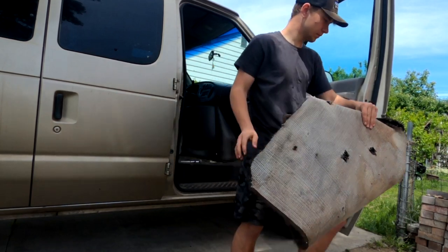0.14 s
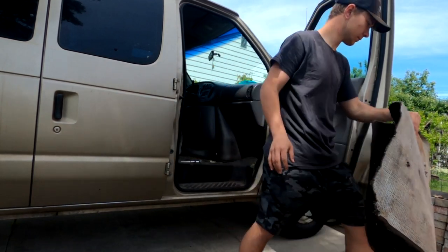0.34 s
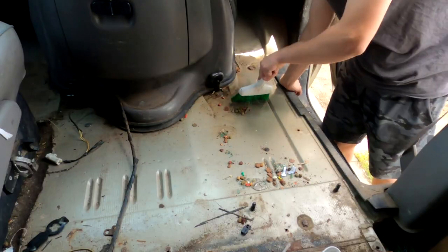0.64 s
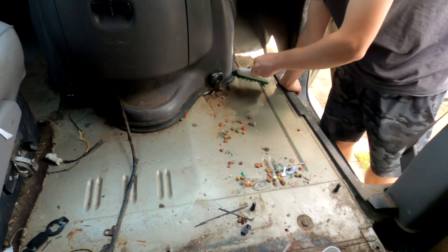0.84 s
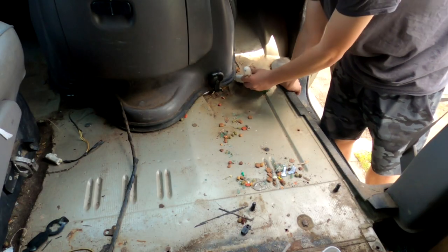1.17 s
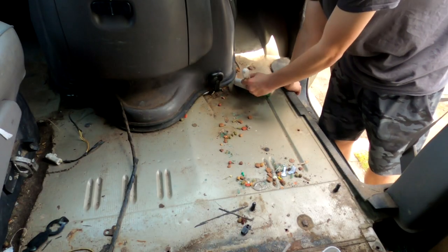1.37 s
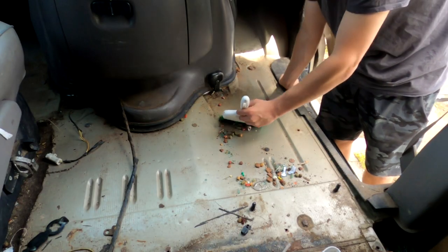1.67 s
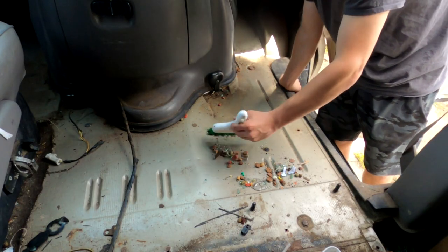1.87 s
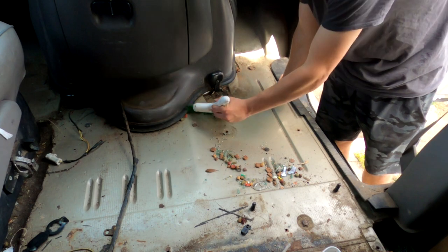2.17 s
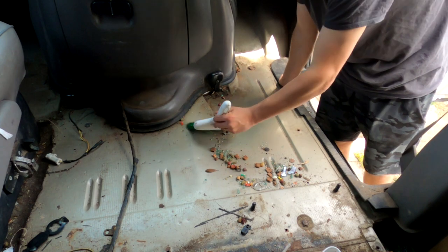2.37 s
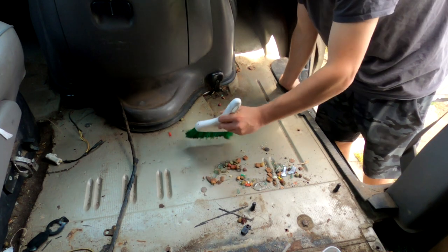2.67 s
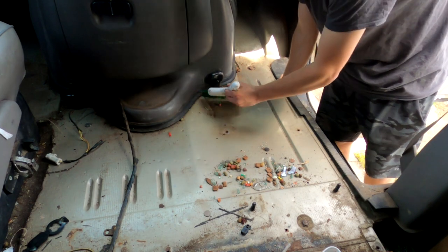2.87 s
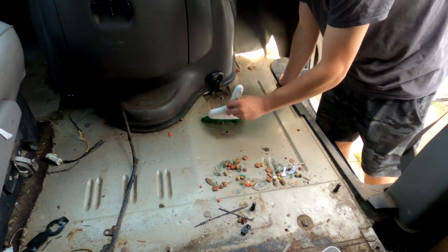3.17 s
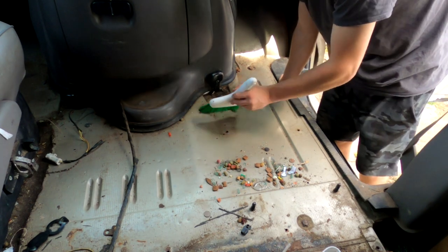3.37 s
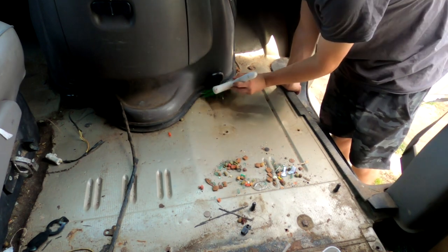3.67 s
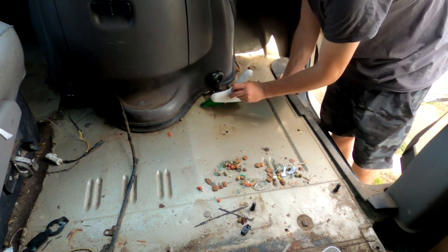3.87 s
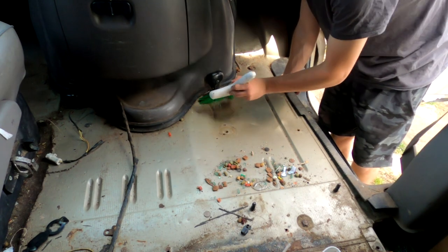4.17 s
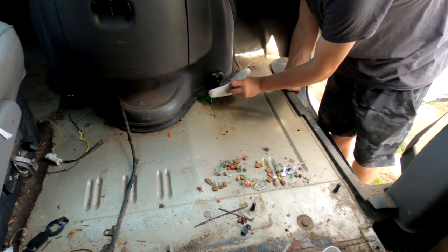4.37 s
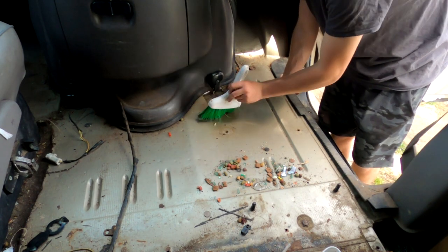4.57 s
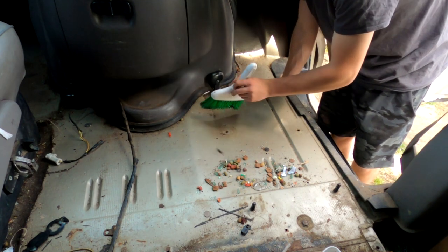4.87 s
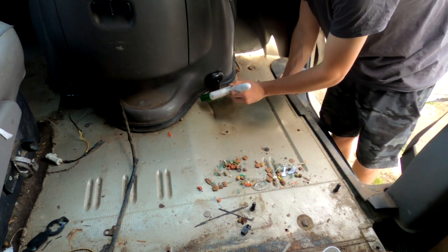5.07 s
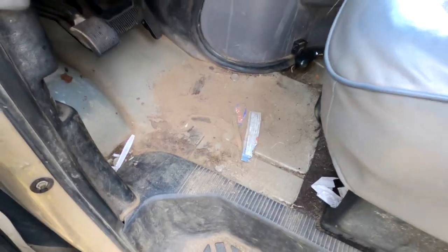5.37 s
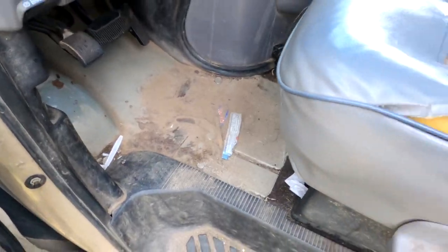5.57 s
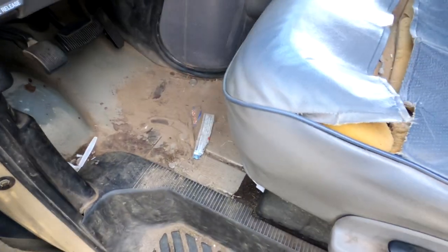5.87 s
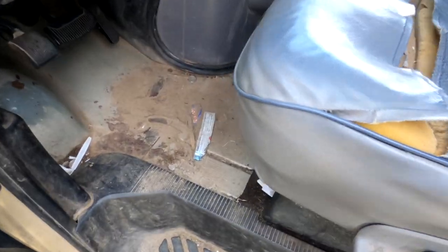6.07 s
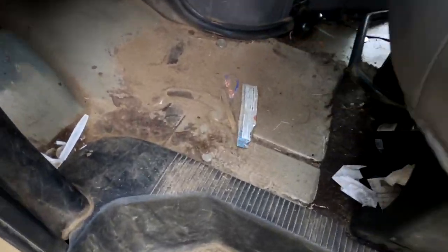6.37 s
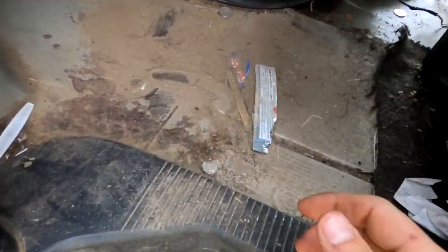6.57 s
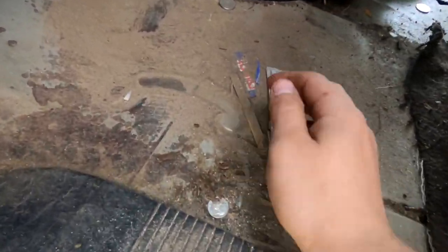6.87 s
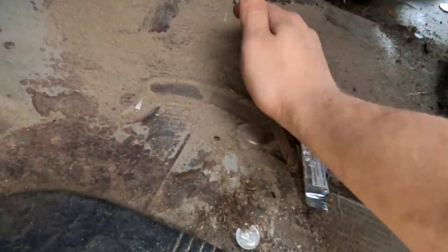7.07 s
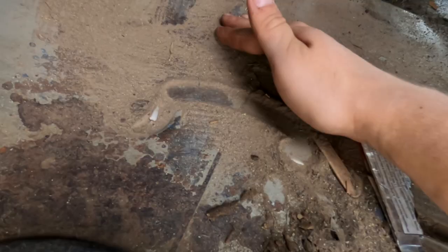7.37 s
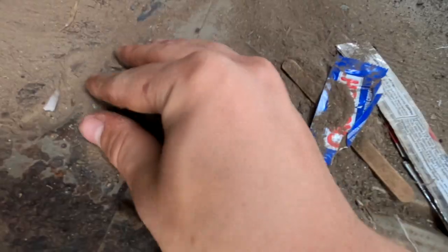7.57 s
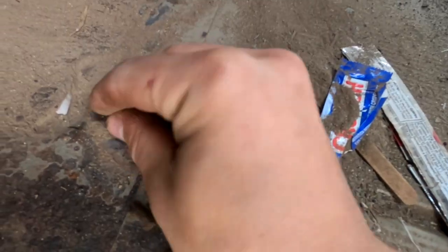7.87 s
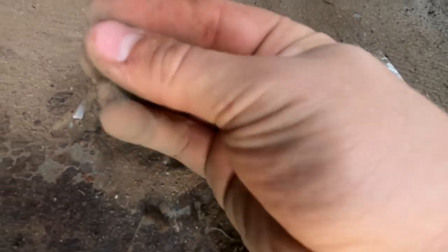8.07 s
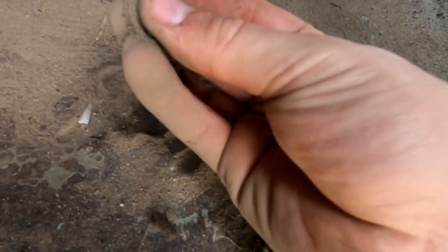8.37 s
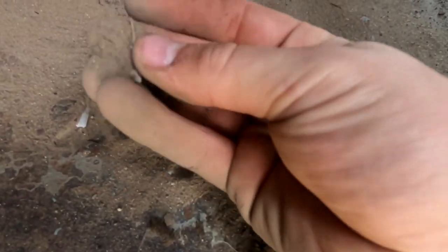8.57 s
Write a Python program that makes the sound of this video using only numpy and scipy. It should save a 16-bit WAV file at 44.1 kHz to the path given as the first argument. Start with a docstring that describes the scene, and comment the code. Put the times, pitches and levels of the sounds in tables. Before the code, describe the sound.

For the first half second, wind buffets the microphone outdoors over faint distant traffic. The sound cuts to the quiet inside of a van, where a hand brush sweeps grit across the bare metal floor. Scraping strokes mix with sharp dabs and crackling debris, and the panel rings and booms. The strongest strokes come around 0.8, 1.8 and 2.5 seconds; lighter ones continue until about 5, with a faint deep rumble near 4. At 5.5 seconds gusty wind and distant traffic return by the open door. A few soft, close clicks fall between 6.1 and 6.9. At about 7.3 and 7.5 a palm lands with two short low thuds and drags through sand, the gritty scrape turning hollow and fading by 8. Fingers then rub the sand in a quiet, bright rustle, with a faint wavering hum under the wind, ending near 8.7 seconds.

```python
"""Sweeping out a van

Three scenes. Outside, wind buffets the microphone over distant traffic. Inside, a hand brush sweeps grit
over the bare metal floor in strokes and dabs, and the panel rings and booms. Then, by the open door in
wind and traffic, a palm lands, drags through sand, and the fingers rub it."""
import sys
import numpy as np
from scipy import signal
from scipy.fft import rfft, irfft, next_fast_len
from scipy.io import wavfile
from scipy.ndimage import uniform_filter1d, map_coordinates

SR = 44100
rng = np.random.default_rng(int(sys.argv[2]) if len(sys.argv) > 2 else 0)


def int16_out(signal):
    """Quantize to a 16-bit WAV file."""
    q = np.round(np.clip(np.atleast_2d(signal).T, -1, 1) * 32767)
    wavfile.write(sys.argv[1], SR, q.astype(np.int16))


N = 384993
T = np.arange(N) / SR


def amp(db):
    return 10 ** (np.asarray(db) / 20)


def unit(x):
    return x / np.sqrt(np.mean(x ** 2) + 1e-20)


def along(points, hz):
    """Read (f, value) points on a log frequency axis."""
    f, v = np.transpose(points)
    return np.interp(np.log(hz + 1), np.log(f + 1), v)


def curve(points, outside=None):
    """Draw (t, value) points as one value per sample."""
    times, values = np.transpose(points)
    return np.interp(T, times, values, outside, outside)


def wobble(rate):
    """A smooth random curve, rate knots a second."""
    return map_coordinates(rng.standard_normal(int(N * rate / SR) + 4), [T * rate])


def filtered(x, response):
    """x through a complex frequency response."""
    m = next_fast_len(N + 8192)
    return irfft(rfft(x, m) * response(np.fft.rfftfreq(m, 1 / SR)), m)[..., :N]


def modes(table, hz):
    """Causal response of a set of resonances."""
    return sum((-1) ** k * amp(db) * 1j * hz * width / (centre ** 2 - hz * hz + 1j * hz * width)
               for k, (centre, width, db) in enumerate(table))


def shaped(x, spectrum, lo_hz=0, hi_hz=SR):
    """One band of x through an EQ curve, at rms 1."""
    edge = lambda hz: 1 / np.sqrt((1 + (lo_hz / (hz + 1)) ** 8) * (1 + (hz / hi_hz) ** 8))
    return unit(filtered(x, lambda hz: amp(along(spectrum, hz)) * edge(hz)))


def contact(start, t60, rise, hold=0):
    """Attack, hold and decay envelope of a contact; times in s."""
    age = np.arange(SR // 2) / SR
    attack = 1 - np.exp(-age / max(rise, 1e-4))
    decay = amp(-60 * np.maximum(age - hold, 0) / max(t60, .01))
    out = np.zeros(N + len(age))
    out[round(start * SR):][:len(age)] = attack * decay
    return out[:N]


def patchy(x, depth_db):
    """Favour other narrow bands every few tens of ms, as shifting contact points do."""
    spectra = signal.stft(x, nperseg=512)[2]
    field = uniform_filter1d(rng.standard_normal(spectra.shape[1:]), size=2, axis=0)
    field = uniform_filter1d(field, size=8, axis=1)
    return signal.istft(spectra * amp(depth_db * unit(field)), nperseg=512)[1][:, :N]


# Left-right likeness at full width: f/Hz, correlation
LIKENESS = [(60, .95), (300, .96), (700, .94), (1400, .88), (3000, .68), (6500, .55), (15000, .1)]

def noise(wide=1):
    """White stereo noise that spreads towards the treble."""
    turn = lambda hz: np.arccos(np.clip(along(LIKENESS, hz), -1, 1)) / 2
    mid, side = filtered(rng.standard_normal((2, N)), lambda hz: [np.cos(turn(hz)), wide * np.sin(turn(hz))])
    return np.array([mid + side, mid - side])


# Outside, inside, open door: start/s, end/s, fade-in/s
SCENES = [(0, .456, .001), (.458, 5.25, .001), (5.46, 9, .06)]

def by_place(outside, inside, door, sill):
    """Switch a bed with the scene; the last scene moves from door to sill at 7.3 s."""
    return np.select([T < SCENES[0][1], T < SCENES[1][1], T < 7.3], [outside, inside, door], sill)


# Traffic fader: t/s, level/dB
TRAFFIC_LEVEL = [(0, -50), (.45, -53), (.48, -63), (1.3, -63), (2.25, -65), (3.7, -65), (5, -65),
                 (5.25, -67), (5.46, -41), (5.65, -39), (5.9, -44.5), (6.3, -42.5), (6.7, -43),
                 (7.1, -46.5), (7.3, -48), (8.05, -54), (8.4, -56), (8.73, -56)]
# Street EQ beside the van, inside it and at the door: f/Hz, level/dB
YARD_EQ = [(240, -30), (400, -12.5), (1250, -18), (1480, -24), (1890, -23.5), (2000, -27), (2340, -25),
           (7830, -40), (12000, -58), (15600, -101), (22000, -120)]
CABIN_EQ = [(200, 2.5), (300, 4.5), (700, -10.5), (1200, -8), (1800, -14.5), (2500, -18.5), (5000, -22.5),
            (9000, -29.5), (15000, -50.5)]
STREET_EQ = [(180, -30), (300, 0), (348, -5), (691, -13), (884, -7), (1440, -7), (2970, -33), (7060, -41),
             (9640, -48), (12100, -77), (15000, -82)]

def traffic():
    """A wash of distant traffic, coloured by each place."""
    wash = patchy(noise(), depth_db=3)
    street = shaped(wash, STREET_EQ)
    bed = by_place(shaped(wash, YARD_EQ), shaped(wash, CABIN_EQ), street, street)
    return amp(curve(TRAFFIC_LEVEL)) * bed


# Wind fader, one curve a scene: t/s, level/dB
WIND_LEVEL = [
    [(0.0, -21), (0.1, -28), (0.14, -32.5), (0.2, -27), (0.29, -23), (0.35, -30), (0.41, -28.5),
     (0.455, -23)],
    [(0.459, -54.5), (1.9, -50.5), (2.4, -50), (3.75, -52), (3.81, -48.5), (4.7, -53.5), (5.25, -55.5)],
    [(5.5, -27.5), (5.8, -25.5), (6.1, -29), (6.3, -22.5), (6.9, -34.5), (7.33, -28), (7.36, -16.5),
     (7.41, -33), (7.47, -27), (8.0, -26), (8.06, -33.5), (8.4, -30), (8.73, -25)],
]
# Wind EQ in the open, in the cabin and low over the sill: f/Hz, level/dB
BUFFET_EQ = [(8.8, -27), (15, 0), (32, 0), (81, 1.5), (191, -11.5), (238, -13), (350, -39.5), (414, -34),
             (600, -42), (780, -42), (1320, -120)]
SHELTERED_EQ = [(8.8, -31.5), (15, 9.5), (48, 1.5), (130, -5), (276, -14), (339, -34), (400, -24),
                (520, -34), (880, -120)]
SILL_EQ = [(8.8, -27), (15, 4.5), (38, 1), (108, 6), (162, -17.5), (253, -17.5), (314, -33.5), (402, -21.5),
           (600, -31), (780, -44), (1320, -120)]

def wind():
    """Lumps of moving air buffet the microphone."""
    gust_db = 1.5
    lumps = amp(0.4 * wobble(17) + 1.74 * wobble(40)) * noise(wide=0.34)
    gusts = shaped(lumps, BUFFET_EQ)
    gusts = unit(gusts - 0.12 * (gusts ** 2 - 1))  # suction peaks are sharper than pressure peaks
    sheltered = shaped(amp(2.2 * wobble(9)) * noise(wide=0.88), SHELTERED_EQ)
    bed = by_place(gusts, sheltered, gusts, shaped(lumps, SILL_EQ))
    return amp(curve(WIND_LEVEL[0] + WIND_LEVEL[1] + WIND_LEVEL[2]) + gust_db * wobble(15)) * bed


# Drone fader: t/s, level/dB
DRONE_LEVEL = [(3.7, -78), (3.82, -42.5), (4.3, -48), (4.9, -56), (5.25, -63)]
# Its resonance: f/Hz, width/Hz, level/dB
DRONE_MODE = [(39.3, 10, 0)]

def drone():
    """A narrow band of sub-bass swells in the cabin."""
    rumble = unit(filtered(noise(wide=0.15), lambda hz: modes(DRONE_MODE, hz) ** 2))
    return amp(curve(DRONE_LEVEL, outside=-120)) * rumble


# Hum fader: t/s, level/dB
HUM_LEVEL = [(8.1, -74), (8.2, -51), (8.73, -53)]

def hum(pitch_hz=400):
    """A thin, wavering tone at the very end."""
    tone = np.sin(2 * np.pi * np.cumsum(pitch_hz + 4 * wobble(10)) / SR)
    return amp(curve(HUM_LEVEL, outside=-120) + 2.5 * wobble(26)) * tone


# Click cues: t/s, level/dB, f/Hz, width/Hz, t60/s, broadband share
CLICKS = [(6.138, -36, 2200, 1500, .07, .01), (6.258, -44, 2000, 1600, .12, .02),
          (6.335, -36, 720, 500, .09, .12), (6.692, -45, 2800, 900, .05, .05),
          (6.838, -42, 3900, 300, .06, .02)]

def clicks():
    """Soft close clicks: puffs of dull noise, each with one resonance."""
    puff = filtered(noise(), lambda hz: 1 / (1 + (hz / 3000) ** 2) / (1 + (hz / 9000) ** 6))
    out = 0
    for start, db, centre, width, t60, share in CLICKS:
        body = unit(filtered(puff, lambda hz: share + modes([(centre, width, 0)], hz)))
        out = out + amp(db) * contact(start, t60, rise=.003) * body
    return out


def friction(lump_db, grain_db, patch_db):
    """Gritty noise: slow pressure lumps, fast grains and single pebbles snapping loose."""
    snaps_per_s, spread_db, snap_db = 1200, 4, -11
    chance, size = rng.random(N), rng.exponential(size=N)
    snaps = unit((chance < snaps_per_s / SR) * amp(spread_db * np.minimum(size, 3)))
    crackle = np.convolve(snaps, amp(-60 * np.arange(40) / 40))[:N]
    hiss = patchy(noise(), patch_db) * amp(lump_db * wobble(90) + grain_db * wobble(1500))
    return hiss * (1 + amp(snap_db) * unit(crackle))


# Metal floor resonances: f/Hz, width/Hz, level/dB
FLOOR_MODES = [(591, 54, -9), (846, 48, -2.5), (1057, 9.1, 1.5), (1225, 24, 4.5), (1374, 11, -1),
               (1751, 5.7, 7), (2130, 12, -13.5), (2217, 11, -2.5), (2727, 2.4, 7.5), (3456, 14, 4),
               (4420, 10, -2), (5770, 59, 2)]

def floor_panel(force):
    """The floor panel adds its resonances to a friction force."""
    return filtered(force, lambda hz: 1 + amp(4.5) * modes(FLOOR_MODES, hz))


# Rub fader: t/s, level/dB
RUB_LEVEL = [(8.1, -57), (8.25, -64), (8.35, -58), (8.546, -50.5), (8.73, -54.5)]
# Rub EQ: f/Hz, level/dB
RUB_EQ = [(1060, -21), (1800, -11), (2080, -7.5), (2430, -6.5), (2650, -3), (3860, -14.5), (5170, -8),
          (7880, -14.5), (8730, -15), (9850, -23), (12700, -26), (14000, -34)]

def finger_rub():
    """Fingers rub sand into a fine, bright rustle."""
    force = friction(lump_db=1.5, grain_db=1, patch_db=1)
    return amp(curve(RUB_LEVEL, outside=-120)) * shaped(force, RUB_EQ)


# Hand landings: t/s, level/dB, f/Hz
LANDINGS = [(7.348, 4, 132), (7.539, -2.5, 92)]

def hand_thumps():
    """The hand lands twice on the floor, each time a short low thud."""
    return sum(amp(db) * contact(start, t60=.014, rise=.0021) * np.sin(2 * np.pi * hz * (T - start))
               for start, db, hz in LANDINGS)


# Drag fader, and the hollow relative to it: t/s, level/dB
DRAG_LEVEL = [(6.9, -58), (7.324, -59), (7.346, -39), (7.352, -35.5), (7.396, -44), (7.43, -31.5),
              (7.458, -27.5), (7.5, -28.5), (7.545, -29), (7.6, -26.5), (7.73, -33), (7.84, -36.5),
              (7.948, -50.5), (8.0, -45), (8.044, -60), (8.12, -60.5)]
HOLLOW_LEVEL = [(7.35, -35), (7.45, -16), (7.72, -9), (7.75, 8.5), (7.769, -1), (7.7715, 12.5),
                (7.796, 11.5), (7.806, 5.5), (7.824, 4), (7.828, 18.5), (7.842, 13), (7.85, 9), (7.94, 9),
                (7.97, 12.5), (8.01, 6.5), (8.03, -6)]
# Sand EQ: f/Hz, level/dB
SAND_EQ = [(110, -30), (180, 1), (213, -3.5), (652, -6), (816, -5), (948, -5.5), (1510, -2.5),
           (2080, -12.5), (2750, -10.5), (3190, -15.5), (7520, -23.5), (12200, -31), (15600, -43.5)]
# Resonances under the cupped hand and the flat hand: f/Hz, width/Hz, level/dB
CUP_MODE = [(1410, 400, 0)]
HEEL_MODES = [(538, 72, -3), (915, 99, 0)]

def palm_drag():
    """The palm drags through sand: flat, it booms on the panel; cupped, it sounds hollow."""
    drum_db, heel_db, heel_ring_db, fizz_db = -4, 5, -3.5, -35.5
    age, second_landing = T - DRAG_LEVEL[0][0], LANDINGS[1][0]
    drag_db = curve(DRAG_LEVEL, outside=-200)
    scrape = amp(drag_db) * np.clip(age / .2, 0, 1)
    drum = scrape * amp(drum_db + heel_db * (T < second_landing + .015))
    fizz = amp(fizz_db + 0.8 * (drag_db - drag_db.max())) * np.clip(age / .25, 0, 1)
    flat = (T > 7.43) & (T < second_landing + .012)
    force = friction(lump_db=1, grain_db=0, patch_db=2)
    hollow = unit(filtered(noise(wide=.4), lambda hz: modes(CUP_MODE, hz) ** 2))
    heel = unit(filtered(force, lambda hz: modes(HEEL_MODES, hz)))
    return (scrape * shaped(floor_panel(force), SAND_EQ, 1820, 7000)
            + drum * shaped(force, SAND_EQ, 0, 970)
            + fizz * shaped(force, SAND_EQ, 3800)
            + scrape * amp(curve(HOLLOW_LEVEL)) * hollow
            + scrape * flat * amp(heel_ring_db) * heel)


# Squeak cues: start/s, end/s, f/Hz, level/dB
SQUEAK_CUES = [(0.617, 0.76, 12800, -47), (0.79, 0.83, 9600, -47), (1.752, 1.803, 12900, -41),
               (2.6, 2.783, 12900, -57)]

def squeaks():
    """Thin, rough squeaks swell and fade at the top of the brushing."""
    out = 0
    for start, end, hz, db in SQUEAK_CUES:
        swell = np.sin(np.pi * np.clip((T - start) / (end - start), 0, 1))
        out = out + amp(db) * swell * wobble(350) * np.sin(2 * np.pi * hz * T)
    return out


# Clear panel notes: t/s, f/Hz, hold/s, level/dB
PANEL_NOTES = [(3.993, 347, .03, -42), (4.625, 345, 0.035, -35.5)]

def panel_notes():
    """A low panel mode sings out briefly."""
    out = 0
    for start, hz, hold, db in PANEL_NOTES:
        envelope = contact(start, t60=.17, rise=.0028, hold=hold)
        out = out + amp(db + 1.3 * wobble(60)) * envelope * np.sin(2 * np.pi * hz * T)
    return out


# Lowest panel modes: f/Hz, width/Hz, level/dB
BOOM_MODES = [(195, 37, -14), (342.4, 34, -0.5)]
# Their swells: t/s, half length/s, level/dB
BOOM_SWELLS = [(0.69, 0.11, -42), (1.81, 0.024, -47), (1.963, 0.029, -41), (2.304, 0.06, -53),
               (3.038, 0.23, -49), (3.216, 0.068, -42), (3.795, 0.04, -55), (3.983, 0.14, -45.5),
               (4.415, 0.038, -50), (4.595, 0.048, -42.5)]

def panel_boom(stroke_drum):
    """The lowest modes boom along with the strokes, with extra swells on cue."""
    level = amp(-8.5) * stroke_drum
    for peak, half, db in BOOM_SWELLS:
        level = np.hypot(level, amp(db) * np.clip(1 - np.abs(T - peak) / half, 0, 1))
    return level * unit(filtered(noise(wide=0.6), lambda hz: modes(BOOM_MODES, hz)))


# Stroke cues: t/s, rise/s, hold/s, level/dB, sag/(dB/s), brightness/dB, drum/dB
STROKE_CUES = [(0.471, 0.0023, 0.074, -35, -5, -7.5, -8), (0.491, 0.11, 0.35, -33.5, 9.5, -2.5, 1),
               (0.98, 0.013, 0.23, -48.5, 62, -10.5, 8.5), (1.25, 0.023, 0.18, -64, 27, 3, 10.5),
               (1.433, 0.035, 0.24, -61, -10.5, 10, 4), (1.734, 0.063, 0.27, -30.5, 37, -3, 4),
               (2.235, 0.044, 0.047, -60, -2, 0.5, 10.5), (2.333, 0.099, 0.02, -51.5, 0, 6.5, 3),
               (2.499, 0.087, 0.31, -37, 16, -2.5, -4), (2.919, 0.022, 0.063, -51.5, 8, -8, 10),
               (3.069, 0.22, 0.022, -37, 2, -3, -5), (3.49, 0.016, 0.14, -55.5, 64, 2.5, 10.5),
               (3.735, 0.051, 0.087, -47, 77, -4.5, 3.5), (3.83, 0.14, 0.12, -46.5, 18, 3.5, 4),
               (4.181, 0.066, 0.19, -44, 53, -1, -4.5), (4.471, 0.12, 0.094, -46, 1, 4, 1.5),
               (4.807, 0.023, 0.28, -49, 147, -6.5, -2.5)]

def strokes():
    """Scrape, rasp, drum and fizz envelopes of long strokes, which dull and drum more as they go."""
    rise_db, lift_db_per_s, dull_db_per_s, deepen_db_per_s = 16.5, 392, 8.5, 18.5
    rasp_db, drum_trim_db, fizz_db = -7.5, -9, -6.5
    pressure_db = .7 * wobble(14)  # the hand presses unevenly
    bands = np.zeros((4, N))
    for start, rise, hold, db, sag, bright_db, drum_db in STROKE_CUES:
        age = np.maximum(T - start, 0)
        shape_db = -rise_db * np.clip(1 - age / rise, 0, 1) - sag * np.clip(age - rise, 0, hold)
        lift_db = lift_db_per_s * np.maximum(age - rise - hold, 0)
        scrape = (T > start) * amp(db + pressure_db + shape_db - lift_db)
        treble = scrape * amp(bright_db - dull_db_per_s * age)
        drum = scrape * amp(drum_trim_db + drum_db + deepen_db_per_s * np.minimum(age, rise + hold))
        fizz = treble * amp(fizz_db - dull_db_per_s * age)
        bands = np.hypot(bands, [scrape, treble * amp(rasp_db), drum, fizz])
    return bands


# Dab cues: t/s, rise/s, level/dB, brightness/dB, ring f/Hz, ring/dB, t60/s
DAB_CUES = [(0.474, .002, -42.5, -5.5, 1806, 11.5, 0.34), (.5207, 0.016, -37.5, -14, 1280, 11.5, 0.24),
            (.637, 0.0062, -44, 15.5, 1100, -3, 0.065), (0.713, 0.0028, -27.5, -2, 1700, 4.5, 0.074),
            (.745, 0.0058, -27.5, 0.5, 2700, -6, 0.027), (.782, .004, -31.5, -14, 1066, -4, 0.17),
            (0.813, 0.0063, -26, 1, 1370, -4, 0.025), (.85, .004, -30, 1.5, 1368, -1, 0.063),
            (.876, 0.0052, -30, 0.5, 1800, 7.5, 0.04), (.9, 0.0025, -26.5, -10, 1040, 2, 0.028),
            (.925, 0.019, -32, -19, 1160, 7, 0.14), (0.972, 0.0027, -33, -15.5, 1380, -1, 0.17),
            (1.112, 0.0013, -51.5, -15.5, 1390, 9, 0.11), (1.1747, 0.0052, -53.5, -7, 1340, 0, 0.5),
            (1.47, .002, -69, -1, 2500, -6, 0.066), (1.7483, 0.0019, -42.5, 8.5, 2060, 0, 0.25),
            (1.7, 0.026, -52, 16, 1330, -8, 0.24), (1.8066, 0.0028, -33, 8, 1000, 2, 0.083),
            (1.853, 0.0051, -27, -2.5, 1450, -1, 0.1), (1.912, .003, -38.5, -2.5, 2000, -3, 0.035),
            (1.948, 0.0043, -27.5, -6, 1250, -3, 0.037), (2.02, 0.0074, -35, -0.5, 2000, 8, 0.044),
            (2.091, 0.001, -36.5, -8.5, 1700, -6, 0.27), (2.1146, 0.0017, -28, 0, 1420, 2, 0.084),
            (2.276, 0.015, -48, 8.5, 1390, 14, 0.054), (2.4518, 0.0023, -53, 16.5, 8500, 7, 0.2),
            (2.4702, 0.0041, -24.5, -2.5, 4310, 3.5, 0.22), (2.476, 0.0084, -30.5, -4, 2770, 6, 0.42),
            (2.481, 0.011, -43.5, -5, 1764, 17, 0.31), (2.546, 0.012, -20.5, -2.5, 2097, 9, 0.088),
            (2.575, 0.0074, -45, -15, 1564, 23.5, 0.15), (2.6115, .006, -34, -9, 2270, 6, .12),
            (2.7, 0.0012, -32.5, 0, 1920, 8, 0.042), (2.726, .008, -31.5, -13.5, 1580, -3, 0.18),
            (2.852, 0.0073, -34, 2, 1900, 3, 0.033), (3.035, 0.014, -32, -6.5, 1050, -6, 0.079),
            (3.1836, 0.0097, -37, -7, 1074, 8, 0.21), (3.226, 0.0033, -35.5, -3, 1450, 6, 0.17),
            (3.276, 0.0012, -32, -3, 1350, 5, 0.048), (3.353, 0.0026, -40.5, -6, 3500, -5, 0.054),
            (3.374, 0.0034, -42.5, -14, 1980, 4, 0.11), (3.4243, 0.001, -32, -4, 1700, -11, 0.086),
            (3.5015, 0.001, -31.5, -10.5, 2090, -2.5, 0.086), (3.596, 0.0012, -51.5, -2.5, 1990, 5, 0.26),
            (3.696, 0.0023, -52.5, -11, 1940, 3.5, 0.13), (3.746, 0.0039, -55.5, 8.5, 4760, 15, 0.041),
            (3.7803, .008, -40.5, -21, 1520, 2, 0.1), (3.902, 0.0028, -42, -2.5, 1310, 5, 0.17),
            (3.9409, 0.0058, -40, 2.5, 1280, 6, 0.26), (4.058, 0.0027, -45, -1.5, 1040, 2, 0.038),
            (4.139, 0.0035, -35, 1, 2800, 6, 0.044), (4.153, 0.0039, -28.5, -4.5, 2400, -6, .08),
            (4.209, 0.0021, -36.5, -3.5, 1600, 3, 0.047), (4.2362, 0.0065, -32.5, 8.5, 2710, 1, 0.039),
            (4.281, .003, -45, 4, 3000, -3, 0.046), (4.317, 0.004, -43, 7, 1720, 0, 0.022),
            (4.373, .003, -50, -1, 2680, 12, 0.073), (4.5406, 0.01, -49, 3.5, 1814, 7, 1),
            (4.8, 0.0006, -46, 9, 2900, -13, 0.045), (4.82, 0.0022, -44, 6.5, 1244, 0, 0.06),
            (4.8876, 0.0008, -47.5, 9, 1560, 10, 0.067), (4.929, 0.0017, -47.5, 4, 2630, -13, 0.11),
            (4.9774, 0.0084, -51, 11, 2000, 7, 0.04)]

def dabs():
    """Sharp dabs that die in the cabin: the same four envelopes, plus the ring of each spot struck."""
    rasp_db, drum_db, fizz_db, crack_db = -4.5, -9, -10, -0.5
    drum_db_per_octave = -13.5  # a spot that rings high drums little
    caught_s = .005  # bristles stay caught this long
    bands, rings = np.zeros((4, N)), np.zeros(N)
    for start, rise, db, bright_db, ring_hz, ring_db, t60 in DAB_CUES:
        low_db = drum_db + drum_db_per_octave * np.log2(ring_hz / 1600)
        scrape = amp(db) * contact(start, t60, rise, caught_s)
        rasp = amp(db + bright_db + rasp_db) * contact(start, 1.62 * t60, rise, caught_s)
        crack = amp(db + bright_db + crack_db) * contact(start, .022, rise / 4)  # the first grit cracks
        drum = amp(db + low_db) * contact(start, 2 * t60, rise)
        fizz = amp(db + bright_db + fizz_db) * contact(start, 1.6 * t60, rise)
        bands = np.hypot(bands, [scrape, np.hypot(rasp, crack), drum, fizz])
        rings += amp(db + ring_db) * contact(start, t60, rise) * np.sin(2 * np.pi * ring_hz * T)
    return bands, rings


# Brush EQ: f/Hz, level/dB
BRUSH_EQ = [(220, -39), (380, -14), (480, -10), (596, -9.5), (826, -7), (1160, -1.5), (1740, 1),
            (1850, 0.5), (2690, -1), (4570, -4), (10700, -29), (12900, -33.5), (15600, -45.5)]
# Brush panning: f/Hz, left minus right/dB
BRUSH_PAN = [(60, -15), (240, -1.5), (950, -1), (3770, 1), (15000, -4.5)]

def brush():
    """Bristles and grit excite the floor panel; strokes and dabs play four bands of the friction."""
    stroke_bands = strokes()
    dab_bands, rings = dabs()
    scrape, rasp, drum, fizz = np.hypot(stroke_bands, dab_bands)
    force = friction(lump_db=0.67, grain_db=0.5, patch_db=3)
    metal = floor_panel(force)
    out = (scrape * shaped(metal, BRUSH_EQ, 990, 3460)
           + rasp * shaped(metal, BRUSH_EQ, 2780, 17000)
           + drum * shaped(metal, BRUSH_EQ, 0, 898)
           + fizz * shaped(force, BRUSH_EQ, 7420)
           + panel_boom(stroke_drum=stroke_bands[2])
           + rings * wobble(330)  # each ring spreads into a rough band
           + panel_notes() + squeaks())
    side, lag_s = np.array([[.5], [-.5]]), 1 / SR  # the left hears the brush later
    return filtered(out, lambda hz: amp(side * along(BRUSH_PAN, hz)) * np.exp(-2j * np.pi * hz * lag_s * side))


def scene():
    return wind() + traffic() + brush() + palm_drag() + hand_thumps() + finger_rub() + clicks() + hum() + drone()


# Stereo image: t/s, width (0 mono, 1 full)
STEREO_WIDTH = [(0, 0), (.46, 0), (.47, 1), (5.3, 1), (5.4, 0), (7.53, 0), (7.58, 1), (9, 1)]

def record(dry, top_hz=15740):
    """Cut the scenes together with silence between, fold the windiest stretches to mono, trim the top."""
    gate = sum(np.clip((T - start) / fade, 0, 1) ** 2 * np.clip((end - T) / .002, 0, 1)
               for start, end, fade in SCENES)
    mid = gate * (dry[0] + dry[1]) / 2
    side = gate * curve(STEREO_WIDTH) * (dry[0] - dry[1]) / 2
    return filtered(np.array([mid + side, mid - side]), lambda hz: hz < top_hz)


dry = scene()
out = record(dry)
int16_out(out)
```